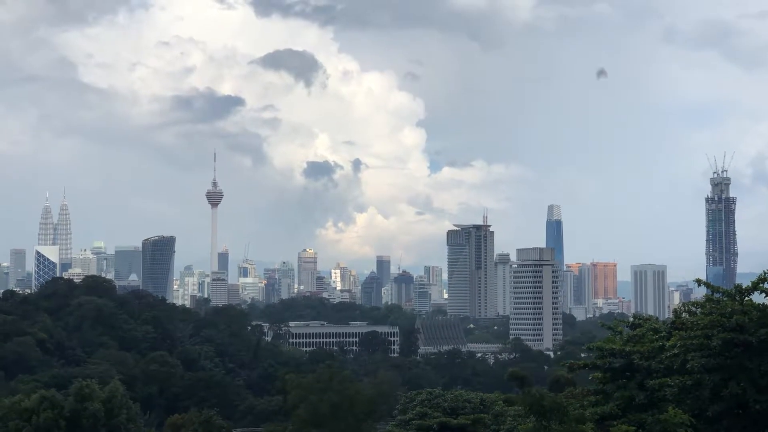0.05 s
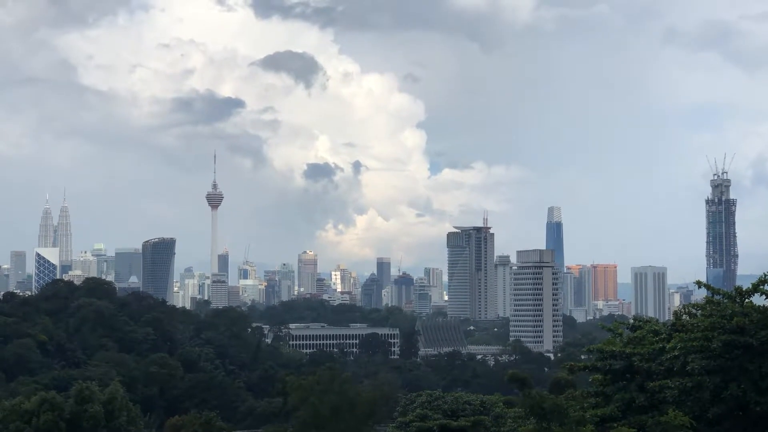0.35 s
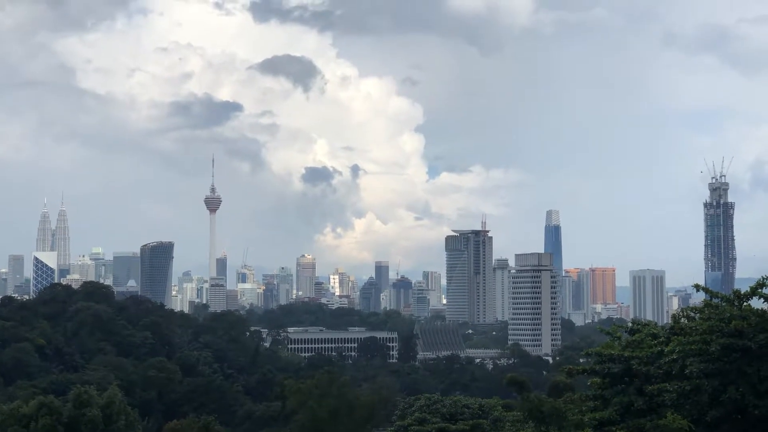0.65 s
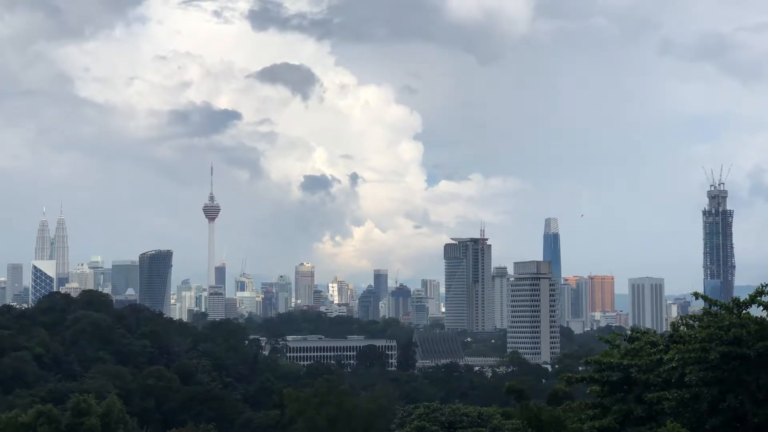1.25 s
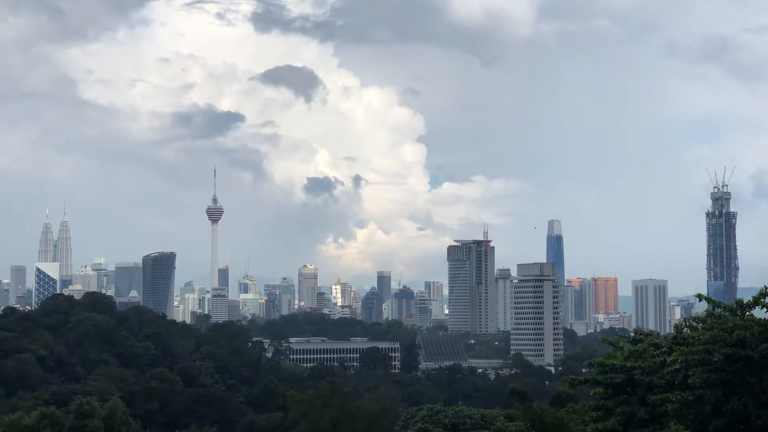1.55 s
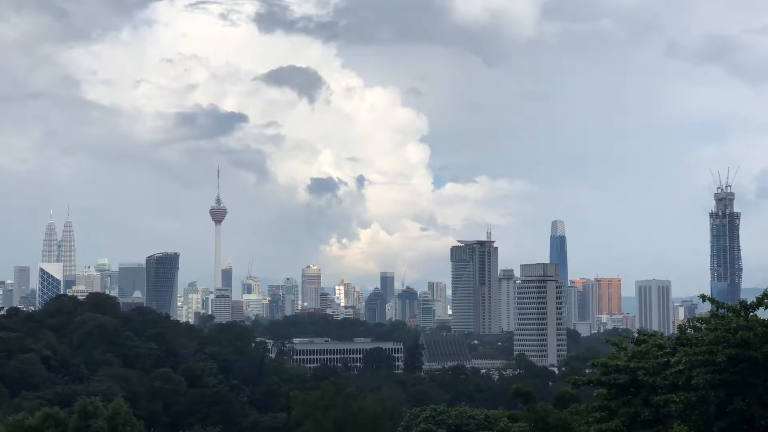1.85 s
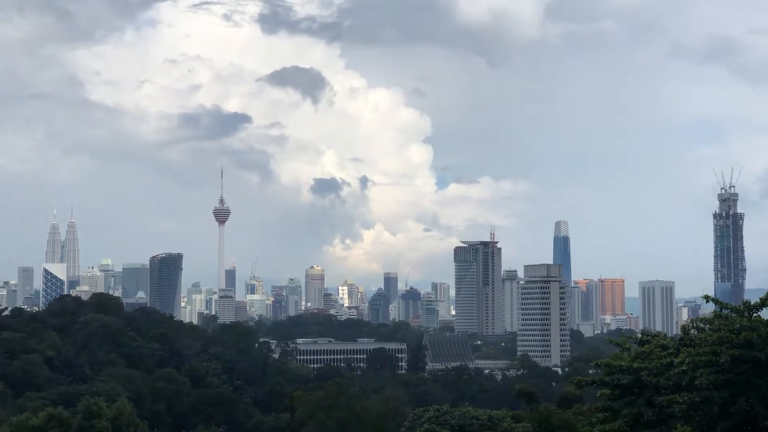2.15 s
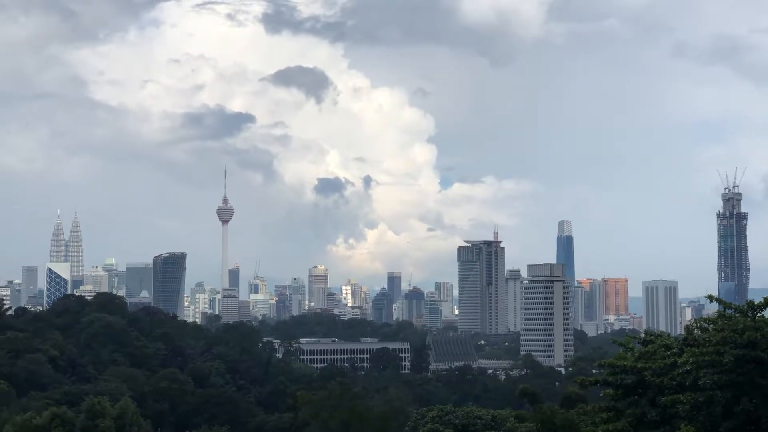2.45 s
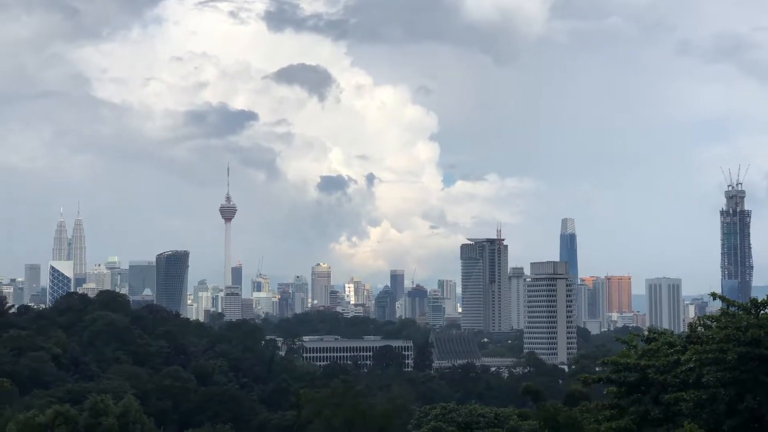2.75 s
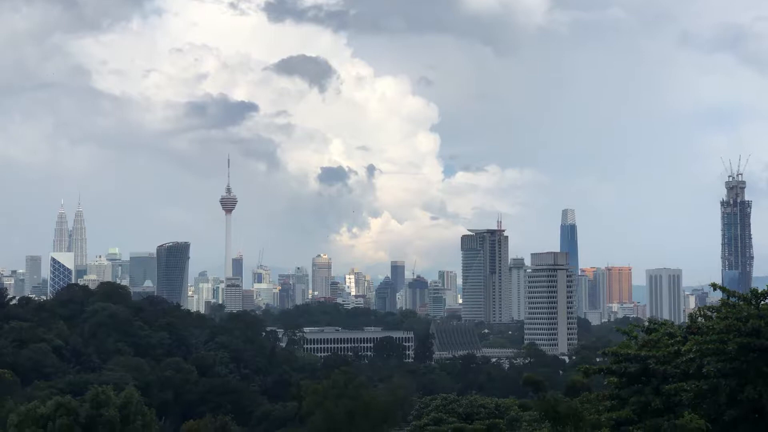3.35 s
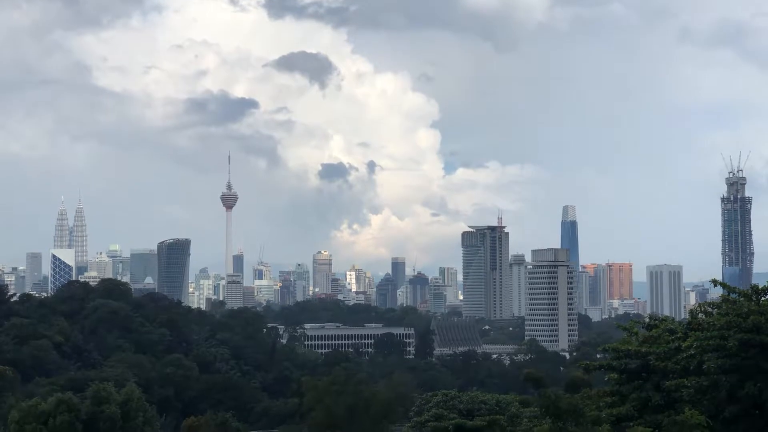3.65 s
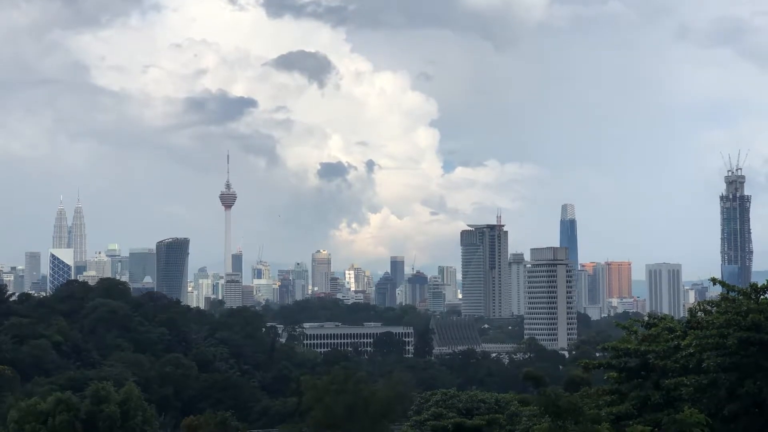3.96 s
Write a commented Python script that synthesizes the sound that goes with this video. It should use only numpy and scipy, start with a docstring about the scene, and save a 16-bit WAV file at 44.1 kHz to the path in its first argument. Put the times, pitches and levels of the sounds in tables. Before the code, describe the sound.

Distant city traffic rumbles steadily for all four seconds, a low drone under an even tyre roar, heard over treetops. The rumble throbs around 0.6, 1.2 and 3.4 seconds, while faint engine notes drift in and out. Nearby leaves hiss softly, with tiny twig ticks near 0.3, 1.7, 2.3 and 3.6 seconds. Very faint, blurred bird calls come around 1 second and from 2.8 to 3.5 seconds.

```python
"""Distant city traffic, heard from one microphone over the treetops. Far engines merge into a throbbing
rumble and a drone under the even roar of tyres, and single engine notes drift in and out.
Close by, foliage and air hiss faintly, twigs and leaves tick, and thin insects sizzle in the canopy.
A few far-off bird calls reach the microphone blurred by the trees."""
import sys
import numpy as np
from scipy import signal
from scipy.fft import irfft
from scipy.io import wavfile
from scipy.ndimage import uniform_filter1d

SR = 44100
rng = np.random.default_rng(int(sys.argv[2]) if len(sys.argv) > 2 else 0)


def to_wav(sig):
    """Store sig (one row per channel, or 1-D mono) as 16-bit WAV at the path in sys.argv[1].

    Samples outside -1..1 are clipped; the rate is SR.
    """
    pcm = np.clip(np.atleast_2d(sig), -1, 1) * 32767
    pcm = np.round(pcm).astype(np.int16)
    wavfile.write(sys.argv[1], SR, pcm.T)  # frames by channels


N = 176400
T, HZ = np.arange(N) / SR, np.fft.rfftfreq(N, 1 / SR)

# Deep rumble of far engines
RUMBLE_SPECTRUM = [(20, -42), (30, -46), (35, -26), (50, -19), (63, -7.5), (69, -2), (77, 0.5), (85, -8),
                   (100, -10.5), (140, -39), (400, -88)]  # frequency_hz, relative_db
RUMBLE_LEVEL = [(0, -44.5), (.2, -35), (.6, -36.5), (1.2, -37.5), (1.9, -37.5), (2.2, -42.5), (2.8, -39),
                (3.3, -40), (3.6, -39.5), (4, -40)]  # time_s, level_db
# Drone of nearer traffic
DRONE_SPECTRUM = [(50, -43), (90, -2.5), (140, 2.5), (180, -4), (215, -8), (300, -17), (600, -58),
                  (2000, -68)]  # frequency_hz, relative_db
DRONE_LEVEL = [(0, -40), (.5, -42), (1.3, -43.5), (2, -44), (3, -48), (4, -47.5)]  # time_s, level_db
# Roar of tyres on far roads
TYRE_SPECTRUM = [(25, -35), (40, -26), (110, 4.5), (240, 8.5), (340, 6), (430, 3), (560, 0), (780, 0),
                 (1000, 0), (1300, -5.5), (1580, -7.5), (2000, -15.5), (2800, -23), (6000, -47)]  # frequency_hz, relative_db
TYRE_LEVEL = [(0, -44), (1.2, -43.5), (2.4, -44), (3.2, -43.5), (4, -43)]  # time_s, level_db
# Moments when the rumble throbs up
THROBS = [(0.202, 0.15, 74, -36.5), (0.471, .09, 71.7, -34.5), (0.581, .09, 73, -30.5),
          (1.033, 0.11, 72, -34.5), (1.177, 0.1, 74.95, -32), (2.992, 0.1, 75.73, -35),
          (3.376, 0.15, 73.3, -33), (3.813, 0.062, 76.4, -36.5)]  # peak_s, length_s, pitch_hz, level_db
# Single engines that stand out of the drone
ENGINES = [(0.58, 1.6, 181, 16, -49), (1.28, 1.95, 139, 8, -46.5), (0.81, 1.46, 240, 11, -53.5),
           (2.41, .7, 262, 55, -48.5), (2.41, 0.85, 325, 23, -52), (2.96, .9, 349, 8.6, -53),
           (1.84, 1.44, 387, 10.3, -54.5), (3.3, 1.2, 118, 9.5, -49.5), (3.5, 1.1, 500, 9.7, -60.5)]  # peak_s, length_s, pitch_hz, width_hz, level_db
# Hiss of foliage and air around the microphone
HISS_SPECTRUM = [(300, -16.5), (2000, -2), (3200, -.5), (4200, -3), (5300, -6.5), (6600, -9.5),
                 (8000, -14.5), (9700, -19), (11200, -22), (15500, -28.5)]  # frequency_hz, relative_db
HISS_LEVEL = [(0, -61.5), (.6, -62.5), (1.9, -62), (2.4, -62), (3, -61), (4, -61.5)]  # time_s, level_db
# Ticks of nearby twigs and leaves
TICKS = [(.342, -57, 0.011, 0), (.824, -63, .022, -2), (1.665, -58.5, .008, -1), (2.324, -56, 0.023, -6.5),
         (2.39, -60.5, .05, -7), (3.618, -53, .004, 0)]  # start_s, level_db, decay_s, tilt_db_per_octave
TICK_SPECTRUM = [(1000, -39), (3000, 9), (4500, 6), (6500, 2), (9000, -9), (12500, -12), (15500, -14)]  # frequency_hz, relative_db
# Bird calls far off through the trees
BIRD_CALLS = [(.09, 0.26, 3400, 300, -69), (.93, 0.17, 4500, 350, -70), (1.2, .2, 4450, 300, -69.5),
              (2.804, 0.35, 3730, 750, -67), (3.002, 0.2, 3150, 950, -67), (3.38, 0.27, 3550, 1000, -64.5)]  # peak_s, length_s, pitch_hz, width_hz, level_db
# Insect sizzle in the canopy
INSECT_BANDS = [(8610, 110, -87), (9080, 430, -87.5), (10270, 320, -89)]  # pitch_hz, width_hz, level_db


def traffic(spectrum, level, steadiness):
    """Distance blends many vehicles into noise; steadiness, 0 to 1, evens out its chance swells."""
    wash = noise(amp(colour(spectrum)))
    local_power = uniform_filter1d(wash ** 2, size=7000, mode="wrap")
    evened = wash / local_power ** (steadiness / 2)
    return unit(evened) * fader(level)


def throbs():
    """Deep engine notes across the city fall into step for a moment and boom, each boom a short tone."""
    out = np.zeros(N)
    for peak_s, length_s, pitch_hz, level_db in THROBS:
        tone = unit(np.sin(2 * np.pi * (pitch_hz * T + rng.random())))
        out += amp(level_db) * swell(peak_s, length_s) * tone
    return out


def engines():
    """Wavering notes of single engines surface from the drone and sink back."""
    return sum(amp(level_db) * swell(peak_s, length_s) * band(pitch_hz, width_hz)
               for peak_s, length_s, pitch_hz, width_hz, level_db in ENGINES)


def foliage_hiss(patch_db=0.94, flicker_db=-0.06):
    """Leaves and air hiss near the microphone, in drifting patches with a very slight overall flicker."""
    spectra = signal.stft(noise(amp(colour(HISS_SPECTRUM))), nperseg=512)[2]
    patches = uniform_filter1d(rng.standard_normal(spectra.shape), size=10, axis=0)  # smooth in pitch
    patches = unit(uniform_filter1d(patches, size=18, axis=1))  # and in time
    flicker = unit(uniform_filter1d(rng.standard_normal(spectra.shape[1]), size=14))
    spectra *= amp(patch_db * patches + flicker_db * flicker)
    hiss = signal.istft(spectra, nperseg=512)[1][:N]
    return unit(hiss) * fader(HISS_LEVEL)


def twig_ticks(rise_s=0.001):
    """Twigs and leaves close by give short dry bursts that die away quickly."""
    out, octaves = np.zeros(N), np.log2(HZ + 1)
    for start_s, level_db, decay_s, tilt_db_per_octave in TICKS:
        age_s = np.maximum(T - start_s, 0)
        envelope = np.minimum(age_s / rise_s, 1) * np.exp(-age_s / decay_s)
        burst = noise(amp(colour(TICK_SPECTRUM) + tilt_db_per_octave * octaves))
        out += amp(level_db) * envelope * burst
    return out


def birds():
    """Each far call comes through the trees as a soft blur around its pitch."""
    return sum(amp(level_db) * swell(peak_s, length_s) * band(pitch_hz, width_hz)
               for peak_s, length_s, pitch_hz, width_hz, level_db in BIRD_CALLS)


def insects():
    """Steady narrow bands of sizzle from the canopy, barely reaching the microphone."""
    return sum(amp(level_db) * band(pitch_hz, width_hz) for pitch_hz, width_hz, level_db in INSECT_BANDS)


def amp(db):
    """Decibels to gain."""
    return 10 ** (db / 20)


def unit(x):
    """Scales to rms 1."""
    return x / np.sqrt(np.mean(x ** 2) + 1e-30)


def fader(level):
    """Gain over time, gliding between level points."""
    return amp(np.interp(T, *np.transpose(level)))


def colour(spectrum):
    """A spectrum in dB, its points joined on a log-frequency axis."""
    hz, db = np.transpose(spectrum)
    return np.interp(np.log(HZ + 1), np.log(hz + 1), db)


def noise(gains):
    """Noise of rms 1 with the given spectrum and random phases."""
    phases = 2 * np.pi * rng.random(len(HZ))
    return unit(irfft(gains * np.exp(1j * phases), N))


def band(pitch_hz, width_hz):
    """A fuzzy tone: noise in a narrow bell around one pitch."""
    return noise(np.exp(-2 * ((HZ - pitch_hz) / width_hz) ** 2))


def swell(peak_s, length_s):
    """A smooth rise and fall around one moment."""
    return np.cos(np.pi * np.clip((T - peak_s) / length_s, -.5, .5))


def scene():
    """One microphone, with the city far off and the trees close by."""
    rumble = traffic(RUMBLE_SPECTRUM, RUMBLE_LEVEL, steadiness=1.0)
    drone = traffic(DRONE_SPECTRUM, DRONE_LEVEL, steadiness=0.4)
    tyres = traffic(TYRE_SPECTRUM, TYRE_LEVEL, steadiness=0.3)
    city = rumble + drone + tyres + throbs() + engines()
    trees = foliage_hiss() + twig_ticks() + birds() + insects()
    return (city + trees)[None]


def record(dry):
    """The recorder cuts off the highest treble."""
    cutoff_hz = 15700
    lowpass = signal.firwin(1023, cutoff_hz, window=("kaiser", 9), fs=SR)
    return signal.oaconvolve(dry, lowpass[None], "same")


dry = scene()
out = record(dry)
to_wav(out)
```